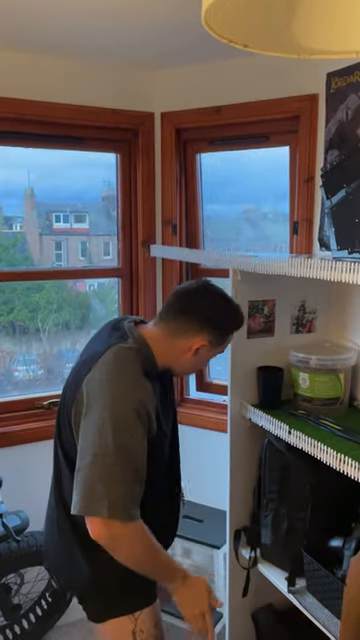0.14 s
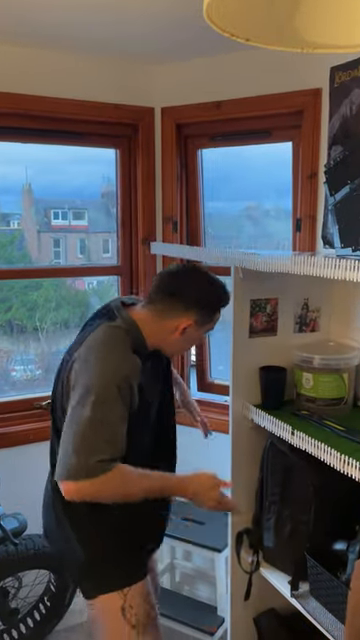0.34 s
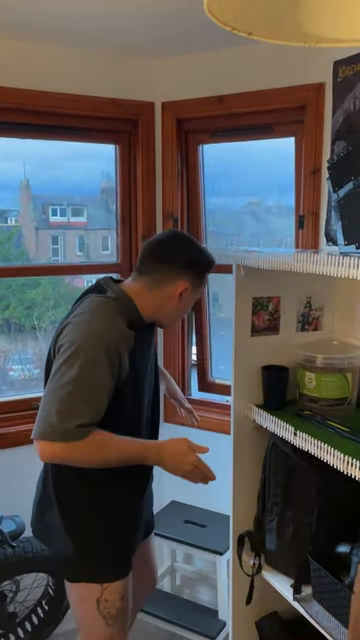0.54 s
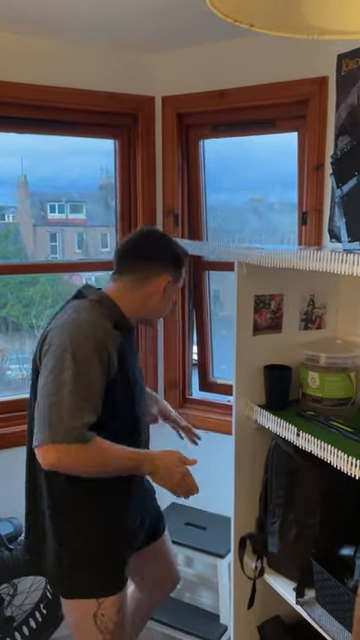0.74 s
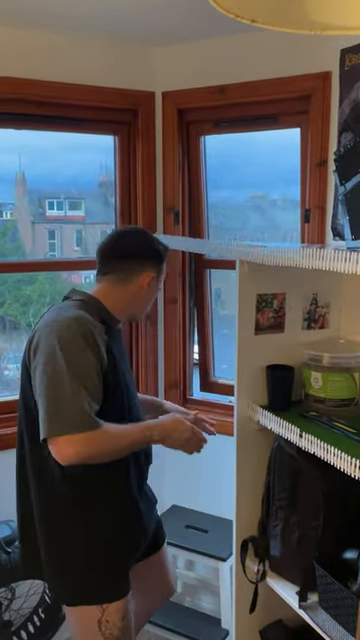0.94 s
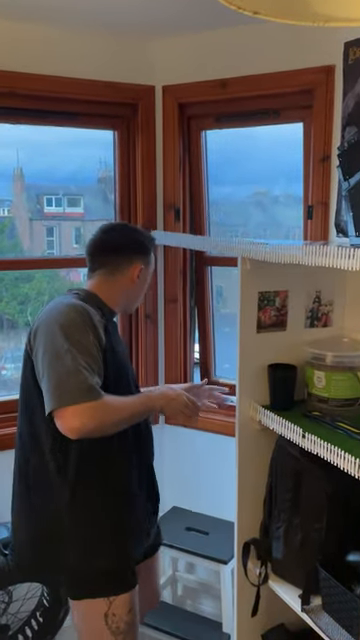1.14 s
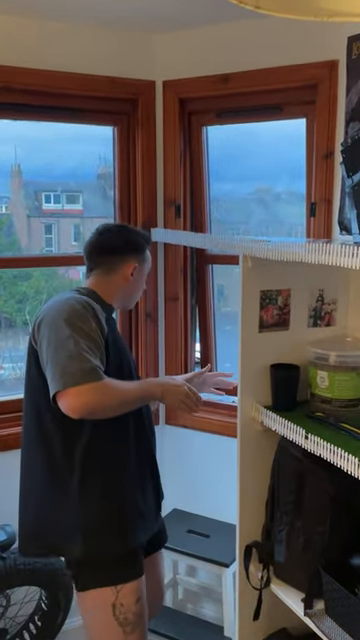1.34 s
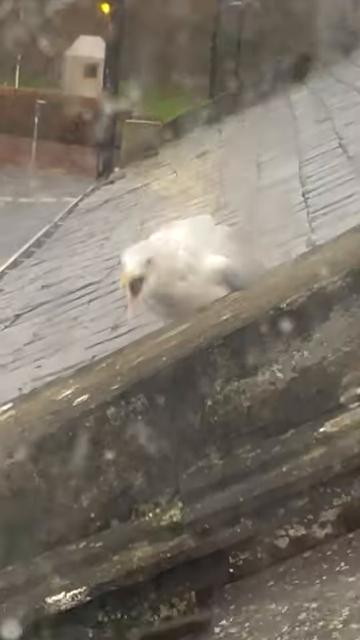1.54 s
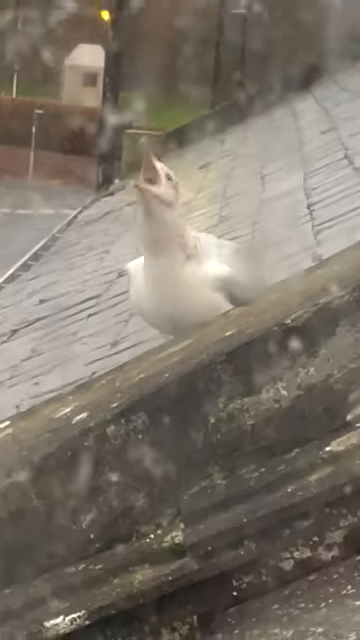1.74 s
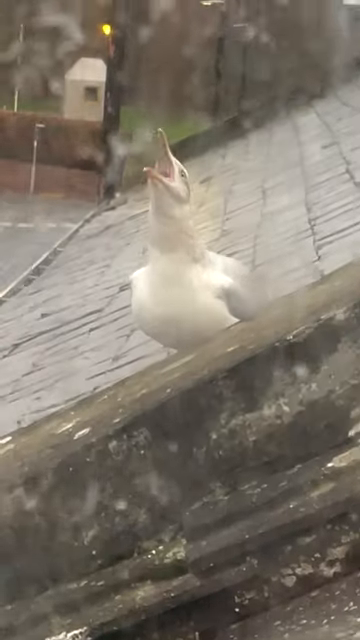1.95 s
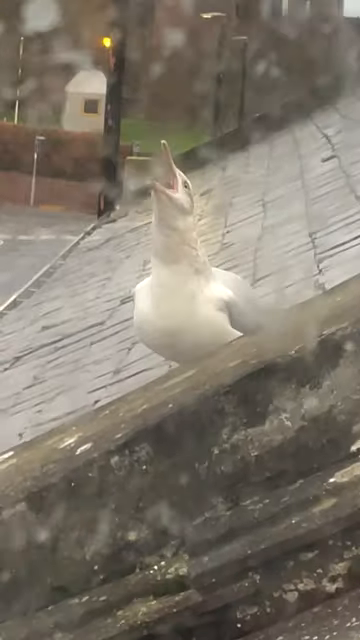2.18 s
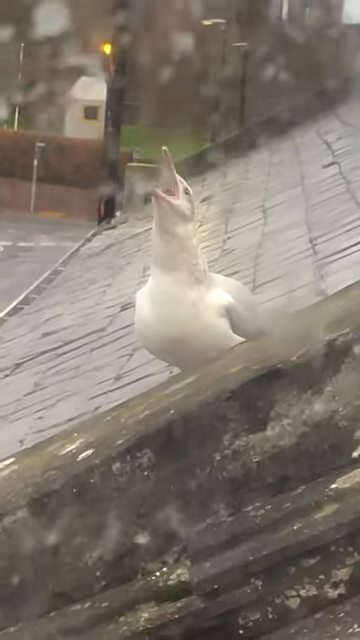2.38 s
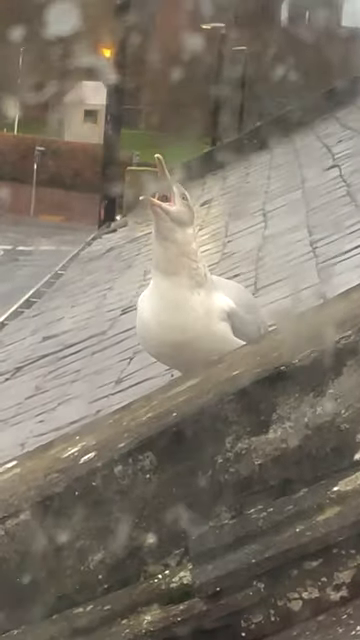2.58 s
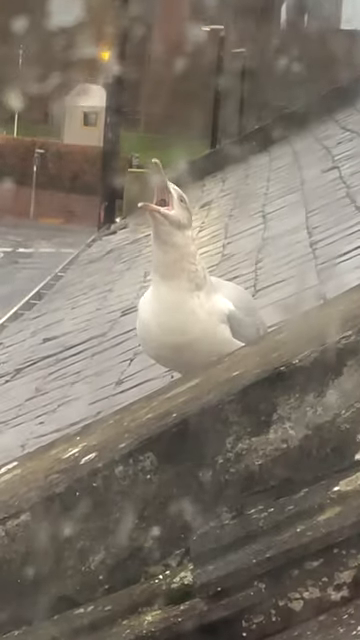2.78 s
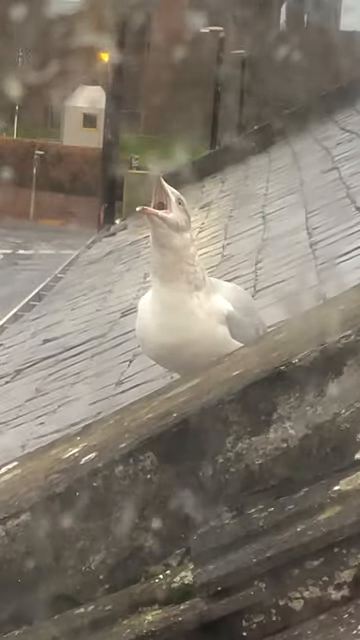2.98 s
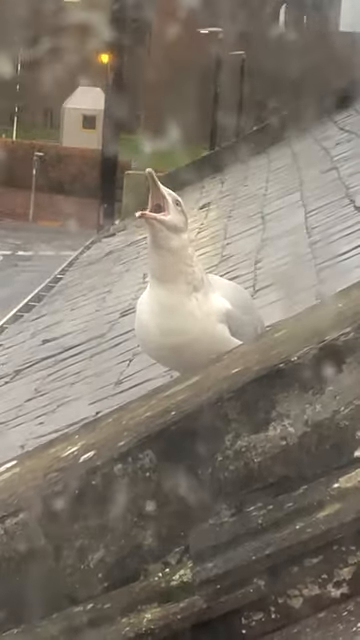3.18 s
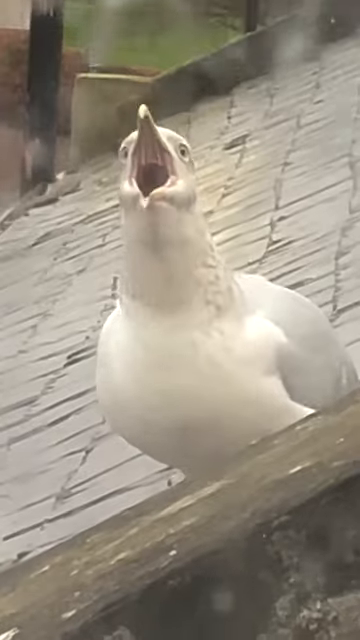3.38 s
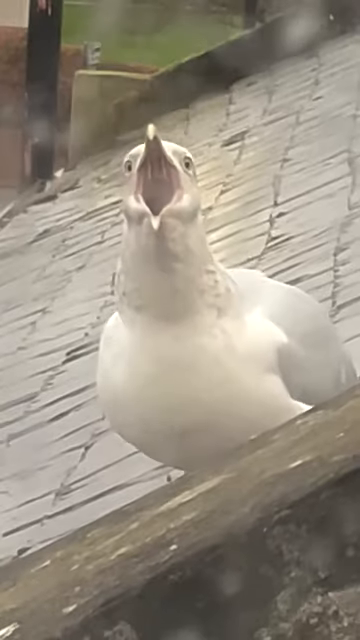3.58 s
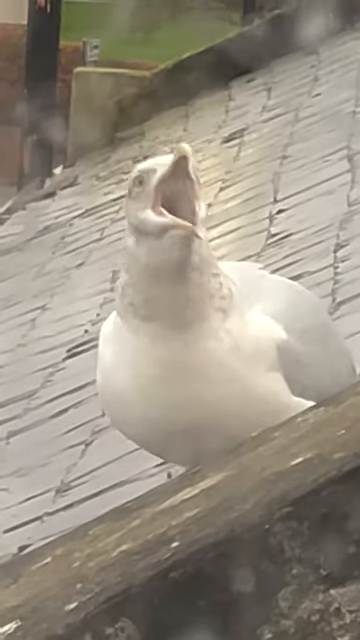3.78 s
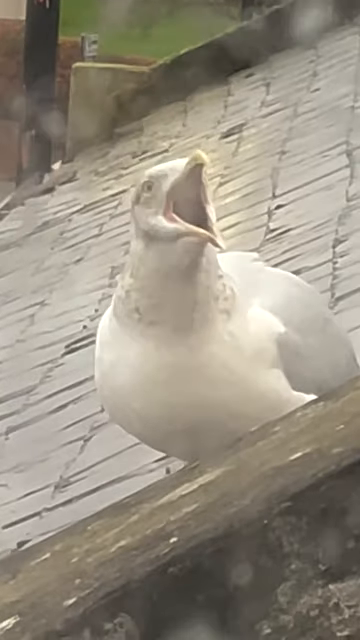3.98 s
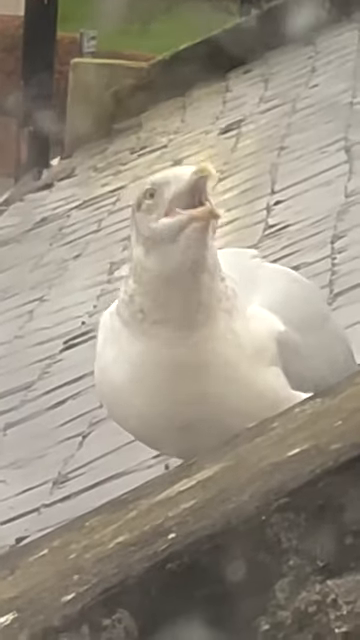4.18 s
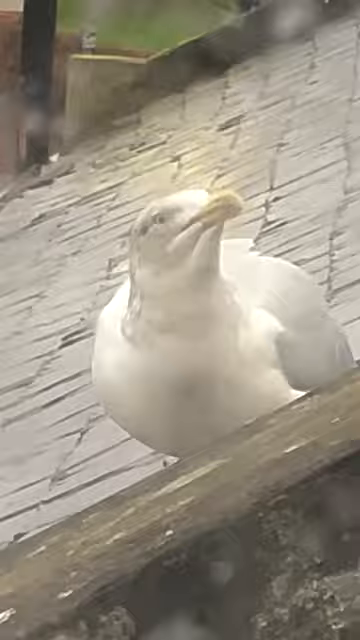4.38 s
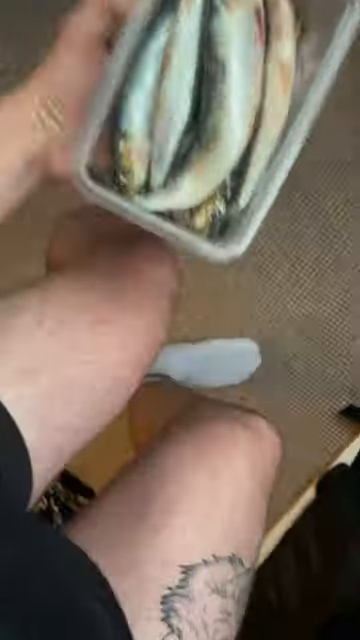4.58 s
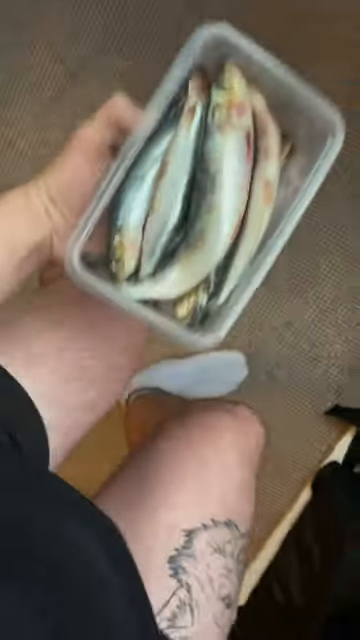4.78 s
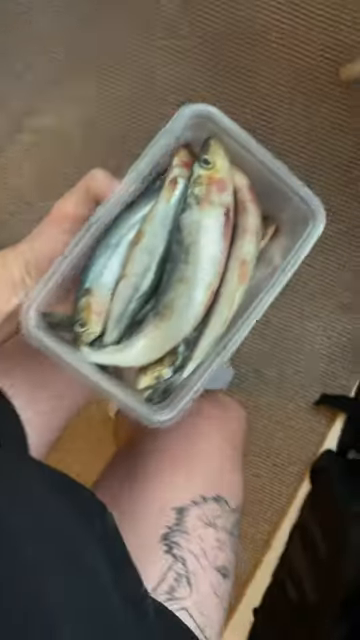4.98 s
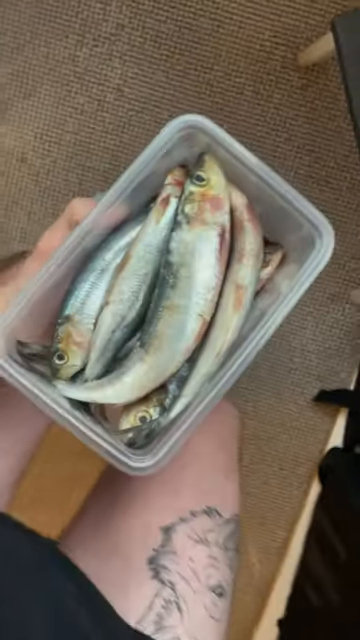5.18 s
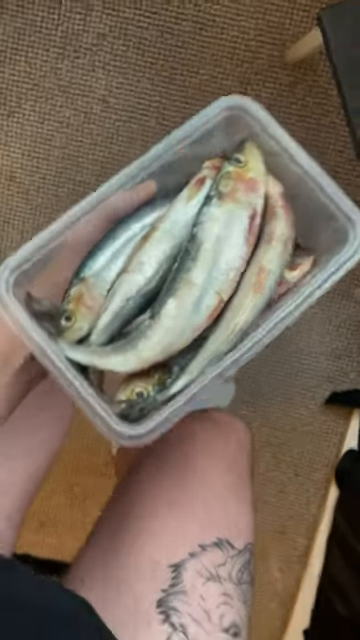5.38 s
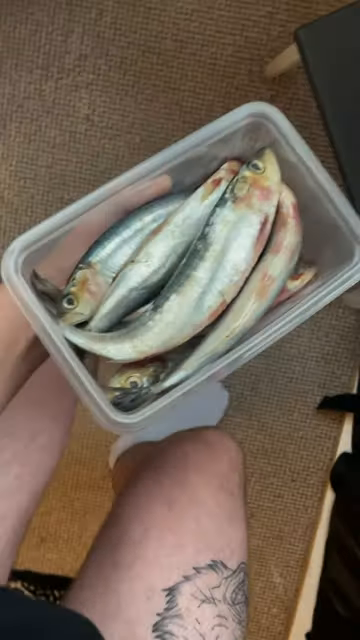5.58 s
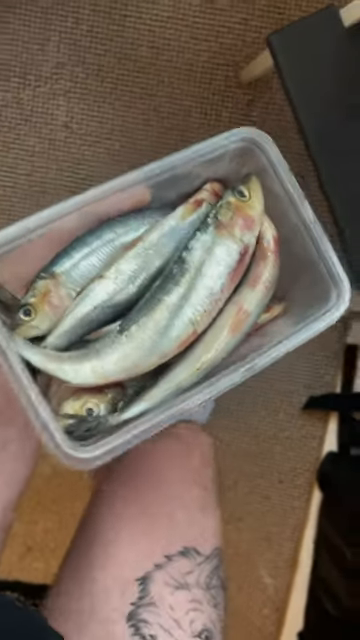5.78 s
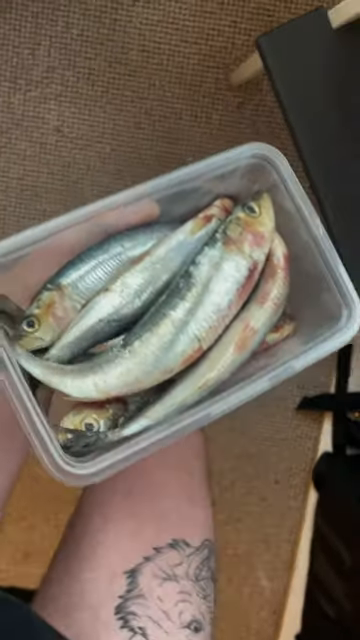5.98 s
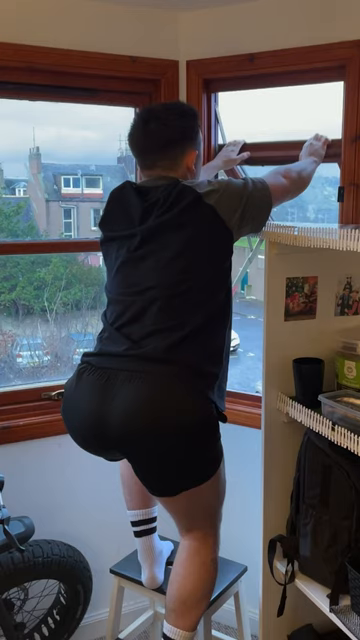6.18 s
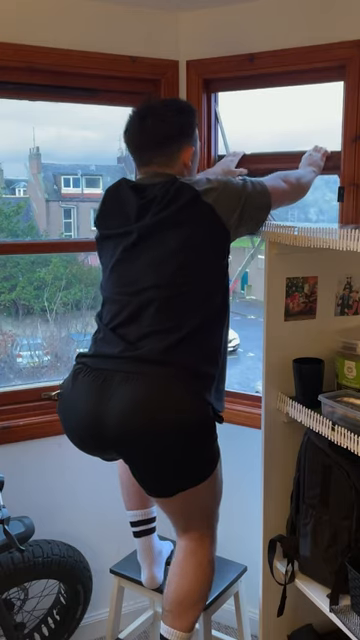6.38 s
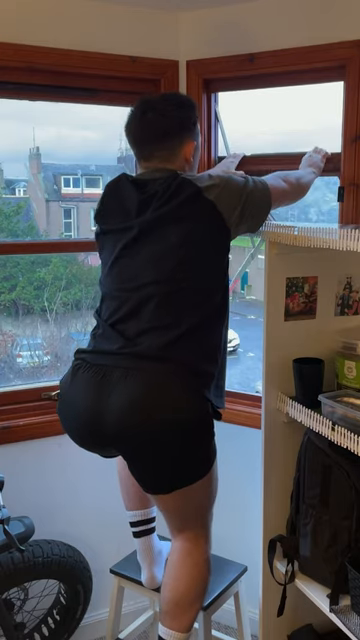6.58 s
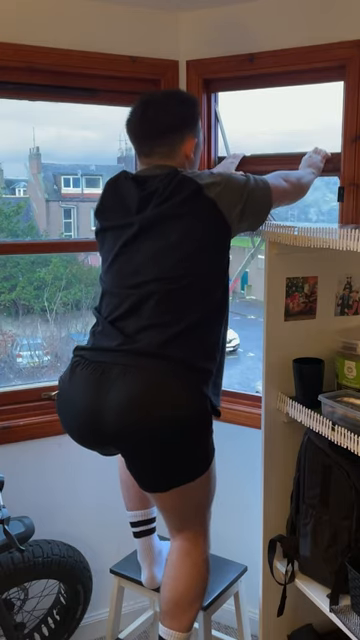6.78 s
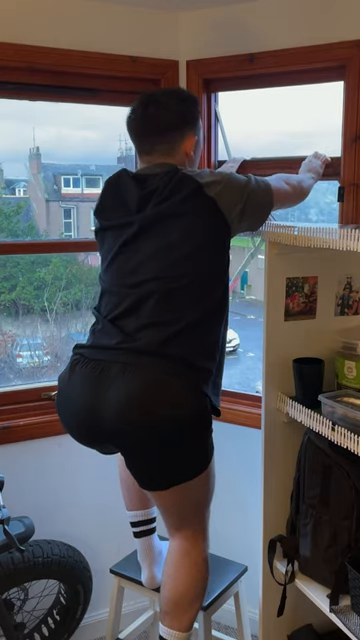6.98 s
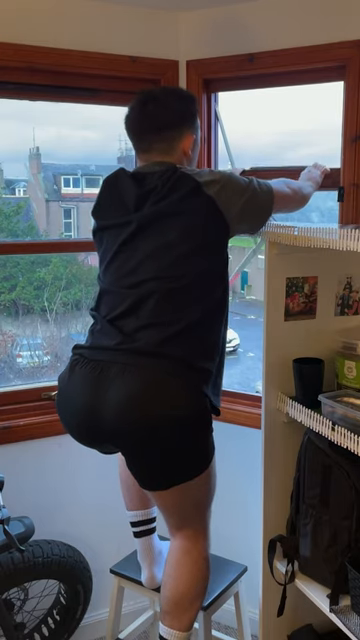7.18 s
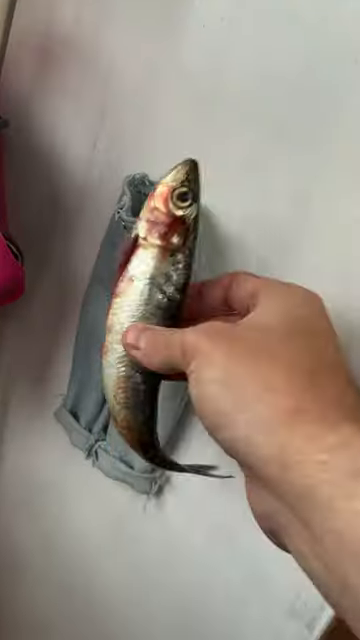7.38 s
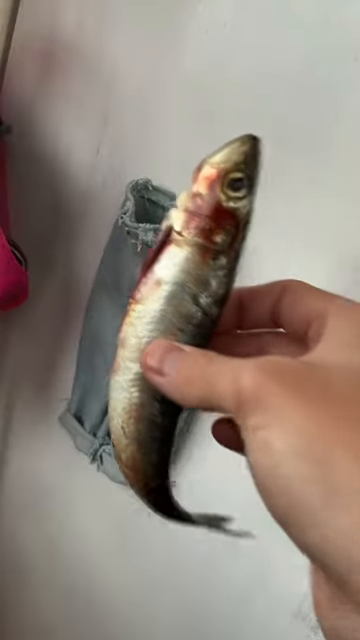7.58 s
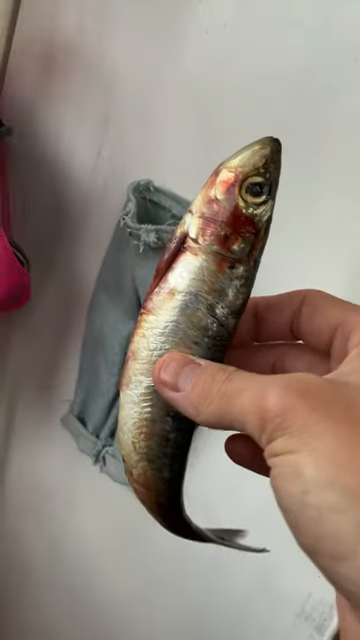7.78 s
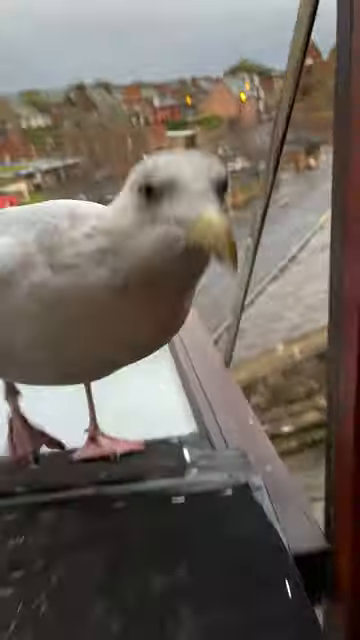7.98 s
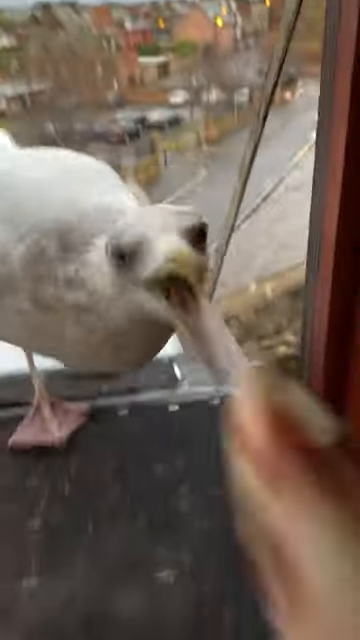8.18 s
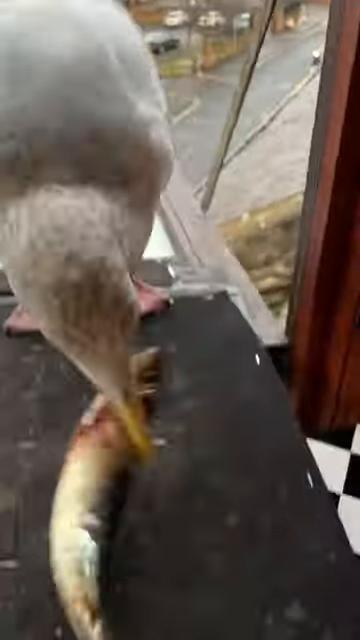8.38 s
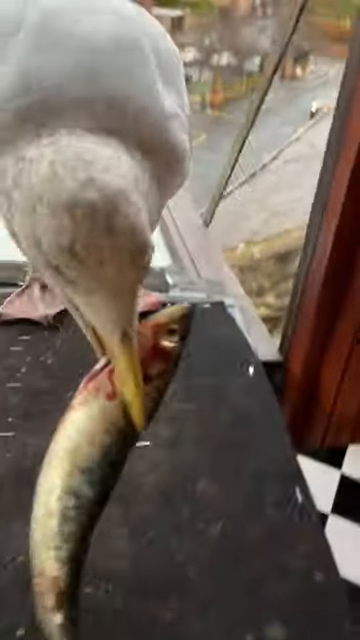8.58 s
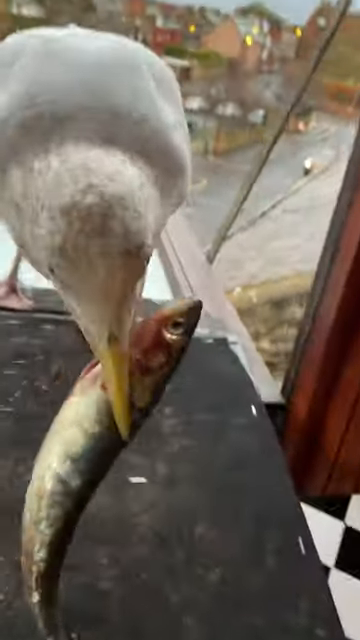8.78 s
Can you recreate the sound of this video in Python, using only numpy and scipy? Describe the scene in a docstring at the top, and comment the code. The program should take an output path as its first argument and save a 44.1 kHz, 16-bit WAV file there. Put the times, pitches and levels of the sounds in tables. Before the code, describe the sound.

Loud yelping gull call trailing into wheezy sighs, followed by two soft scrapes and sharp beak snaps with thuds on a windowsill.

```python
"""On a slate roof by an open window, a herring gull gives its long call: a held note, ten yelps and three
wheezy sighs, with thin whistles in between. Membranes shake in its voice box and its throat shapes the tone.
Indoors, something slides in two long scraping strokes. Then the gull snatches a fish at the window,
with thumps on the sill and clicks of its beak. Soft steps, far birds, an engine and the street lie behind."""
import sys
import numpy as np
from scipy import signal
from scipy.fft import rfft, irfft, next_fast_len
from scipy.io import wavfile
from scipy.ndimage import uniform_filter1d, map_coordinates

SR = 44100
rng = np.random.default_rng(int(sys.argv[2]) if len(sys.argv) > 2 else 0)


def int16_out(signal):
    """Quantize to a 16-bit WAV file."""
    q = np.round(np.clip(np.atleast_2d(signal).T, -1, 1) * 32767)
    wavfile.write(sys.argv[1], SR, q.astype(np.int16))


N = 390285
T = np.arange(N) / SR
TOP_HZ = 15850  # the highest frequency kept

# The yelps. Each row: times in seconds of the throat's catch, the jump up and the voice's break,
# pitch at the break in Hz, level of the high cry in dB, level of the low lead-in in dB.
YELPS = [(1.606, 1.692, 1.747, 1183, -12, -25.5), (1.842, 1.918, 1.964, 1194, -11, -18),
         (2.087, 2.157, 2.206, 1188, -11, -18), (2.338, 2.406, 2.453, 1187, -10.5, -17.5),
         (2.591, 2.652, 2.699, 1183, -11, -18.5), (2.846, 2.909, 2.958, 1176, -10.5, -17),
         (3.109, 3.17, 3.222, 1174, -11.5, -19), (3.38, 3.434, 3.495, 1166, -11, -26),
         (3.661, 3.691, 3.785, 1171, -12.5, -35), (3.992, 4.015, 4.135, 1153, -14, -21.5)]
# The opening note and the squeak after it. Each row: time in seconds, pitch in Hz, relative level in dB.
HELD_NOTE = [(1.108, 1291, -29), (1.14, 1241, -30), (1.204, 1248, -24), (1.242, 1284, -28.5),
             (1.256, 1312, -40), (1.278, 1370, -36), (1.288, 1450, -38)]
SQUEAK = [(1.29, 1853, -40), (1.314, 1852, -40), (1.37, 1866, -50), (1.428, 1914, -45), (1.44, 1890, -49),
          (1.46, 1764, -38), (1.478, 1720, -41.5)]
# Throat catches around those two. Each row: time in seconds, rise in seconds, relative level in dB.
OPENING_CATCHES = [(1.087, 0.029, -6.5), (1.481, .004, -1)]
# Whistles between notes. Each row: start in seconds, length in seconds, starting pitch in Hz, level in dB.
WHISTLES = [(0.782, 0.16, 1910, -57.5), (2.463, 0.18, 2276, -35.5), (2.766, 0.072, 3026, -38),
            (3.065, 0.064, 3013, -36.5), (3.365, 0.035, 2996, -32.5), (3.64, 0.057, 2990, -34),
            (3.933, 0.059, 2980, -35), (4.228, 0.059, 2970, -36), (4.524, 0.056, 2940, -39),
            (4.833, 0.043, 2947, -44.5)]
# The closing sighs. Each row: start in seconds, relative level in dB.
SIGHS = [(4.286, 1), (4.58, -2), (4.88, -11)]
# The two wheezes of a sigh. Each row: delay in seconds, length in seconds, relative level in dB.
SIGH_PARTS = [(0, .062, 1), (0.077, .118, -17)]
# Beak clicks. Each row: time in seconds, level in dB, relative level of the wood's ring in dB.
BEAK_CLICKS = [(8.142, -18, -6), (8.2567, -31.5, 6), (8.2985, -17, -4), (8.3517, -22, 5.5),
               (8.3949, -28, -20), (8.422, -41.5, 5), (8.4444, -35, 3), (8.5661, -31.5, -22),
               (8.606, -31.5, -23), (8.794, -23, -4.5), (8.812, -27, -1.5)]
# The fish hitting the sill. Each row: time in seconds, level in dB.
FISH_THUMPS = [(8.142, -29), (8.2581, -14.5), (8.288, -22), (8.349, -32), (8.442, -30)]
# The notes a struck frame and sill ring at. Each row: pitch in Hz, level in dB, seconds to fade by 60 dB.
FRAME_NOTES = [(1210, -0.5, 0.031), (1866, -6, 0.025), (2850, -5, 0.016), (3520, -17, 0.012),
               (5300, -16.5, 0.0077)]
SILL_NOTES = [(81.7, -9.5, .45), (131, -3, .11), (288, -7.5, .11), (385.4, 4.5, 0.04), (762, -6, 0.025)]
# Scraping strokes. Each row: start, fastest moment and end in seconds, level of the hollow rub in dB,
# level of the hiss in dB, pitch of the rub as a ratio.
STROKES = [(5.577, 6.194, 6.56, -35.5, -41, 1), (6.83, 7.301, 7.56, -36, -48, 0.81)]
# Light rustles. Each row: middle in seconds, rough half length in seconds, level in dB.
RUSTLES = [(0.11, 0.022, -66), (0.383, 0.045, -57.5), (.56, 0.028, -56), (0.716, 0.038, -65),
           (5.394, .013, -54), (5.441, 0.029, -62.5), (6.591, 0.02, -62.5), (6.69, 0.014, -65.5),
           (6.863, 0.0047, -50), (8.327, 0.021, -43.5), (8.445, 0.011, -47.5), (8.585, .015, -63),
           (8.775, 0.028, -57.5)]
# Soft steps. Each row: time in seconds, pitch of the floor in Hz, level in dB.
STEPS = [(0, 60.36, -44), (0.611, 68.5, -43)]
# Far bird calls. Each row: start and end in seconds, first and last pitch in Hz, level in dB.
FAR_BIRDS = [(7.583, 7.716, 4400, 4390, -71), (7.76, 7.94, 1613, 1516, -71), (7.837, 7.94, 4340, 4170, -63)]
# The background's rises and falls. Each row: start in seconds, rumble level in dB, street level in dB.
BACKGROUND_LEVELS = [(0, -62, -69), (1, -54, -58), (3.3, -55.5, -58.5), (4.401, -58.5, -60),
                     (5.029, -62.5, -74.5), (5.8, -50.5, -64), (7.55, -56, -60), (8.038, -42, -46.5)]

# Tone colours: how strong each sound is from bass to treble. Each row: frequency in Hz, gain in dB.
THROAT_TONE = [(850, -15.5), (1080, -4.5), (1210, -4), (1340, -9), (1750, -27), (2230, -8), (2500, 0),
               (2750, -1.5), (3600, -21), (4700, -40), (6200, -39.5), (7400, -32.5), (11500, -44.5),
               (15000, -74.5)]
SQUEAK_TONE = [(1800, 1.5), (3600, -22.5), (5600, -14), (7500, -24), (9400, -23), (11300, -51),
               (13500, -40.5)]
WHISTLE_TONE = [(2000, -5.5), (3100, 4.5), (3900, -28.5), (6000, -40.5), (9000, -45), (14000, -66)]
WHEEZE_TONE = [(690, -19.5), (1400, 1.5), (2100, -9.5), (2800, -5), (3400, -6), (4200, -26), (5500, -49),
               (8000, -23.5), (13000, -47.5)]
RASP_TONE = [(150, -40.5), (400, -5), (650, -15.5), (900, -3), (1150, 13), (1400, -6.5), (1750, -6),
             (2550, 1.5), (3200, -4.5), (4500, -32.5), (7500, -33), (12000, -39), (16000, -61.5)]
RUB_TONE = [(30, -47), (70, -3), (130, 2), (230, 2.5), (340, -1), (470, -5.5), (750, -14), (1500, -28.5),
            (4000, -48.5)]
HISS_TONE = [(300, -1), (700, 7), (1200, 1.5), (2500, -2.5), (4000, -6), (5500, -7), (8500, -11),
             (12000, -11.5), (14000, -18), (16000, -34)]
RUSTLE_TONE = [(300, -15), (800, -8.5), (1300, -0.5), (2800, 0), (5500, -5), (12000, -3), (16000, -23.5)]
FAR_BIRD_TONE = [(1600, 5.5), (3000, -17.5), (4400, -7.5), (4800, -27), (6000, -40)]
RUMBLE_TONE = [(22, -42.5), (42, 1.5), (62, -1.5), (100, -2.5), (160, -10), (300, -30), (700, -47)]
STREET_TONE = [(100, 4), (250, 0), (500, -4.5), (800, -4.5), (1150, -2.5), (1800, -12.5), (3000, -24),
               (5000, -36), (12000, -32.5), (16000, -61.5)]
ECHO_TONE = [(300, -3), (1200, 0.5), (2400, -9.5), (3000, 2), (4200, 6.5), (8000, -1)]
MICROPHONE_TONE = [(20, -14.5), (40, 1), (12500, 0), (14000, -5), (15800, -18)]
# How long the walls' echo lasts. Each row: frequency in Hz, seconds to fade by 60 dB.
ECHO_FADE = [(200, .4), (1200, 0.55), (2800, 0.41), (6000, 0.1), (12000, 0.13)]
# The microphone's two openings. Each row: frequency in Hz, how far the left wave leads in radians.
LEFT_LEAD = [(100, 0), (250, .22), (700, .33), (1300, .42), (2500, .45), (4000, .65), (5500, .4),
             (7000, 1.35), (8500, 2.35), (9400, 3), (10600, 3.25), (12000, 4.2), (15500, 6.2)]


def voice(path, tone, jitter, hoarse=0, break_s=np.inf):
    """A bird's voice box makes a pitch and its multiples (harmonics); the throat colours them."""
    # Each row of path: time in seconds, pitch in Hz, level in dB, brightness in dB.
    t = np.arange(path[0][0], max(path[-1][0], path[0][0] + .01), 1 / SR)
    hz, db, bright_db = curves(path, t)
    # once the voice breaks, the membranes shake unevenly
    broken = ramp((t - break_s) / .0025 + 1)
    hz = hz * (1 + (jitter + .013 * broken) * wobble(700, len(t)) + jitter * wobble(90, len(t)) / 2)
    phase = 2 * np.pi * np.cumsum(hz) / SR
    harmonic = np.arange(1, 11)[:, None]
    upper = harmonic > 2
    # pressing harder lifts the upper harmonics most
    lift_db = np.where(upper, 1, (harmonic - 1) * .22) * bright_db
    flutter_db = np.array([wobble(110, len(t)) for _ in harmonic]) * np.where(upper, 3.5, .4)
    gains = amp(db + along(tone, harmonic * hz) + lift_db + flutter_db) * (harmonic * hz < TOP_HZ)
    # hoarseness roughens the upper harmonics; the lowest two stay nearly pure
    fray = 1 + hoarse * np.where(upper, 2 * harmonic, .5) * np.array([wobble(800, len(t)) for _ in harmonic])
    # every other shake is unequal, which adds weak tones halfway between the harmonics
    halfway_gain = hoarse * amp(db - 11 + 8 * wobble(23, len(t)))
    halfway = sum(k * np.sin((k + .5) * phase + wobble(420, len(t))) for k in (1, 2))
    harmonics = np.sum(gains * fray * np.sin(harmonic * phase), axis=0)
    return (harmonics + halfway_gain * halfway) * signal.windows.tukey(len(t), .05)


def yelps(low_hz=1109, high_hz=1337.4, broken_hz=983, attack_s=.0077, crest_s=.02):
    """Each yelp starts low, jumps to a loud high cry, sags, then breaks and drops."""
    out = np.zeros(N)
    middle_s = np.mean([row[0] for row in YELPS])
    for catch_s, jump_s, break_s, end_hz, cry_db, lead_db in YELPS:
        start_s = catch_s + .013  # a tiny pause after the catch
        tail_s = .48 * (break_s - jump_s)
        t = T[(T >= start_s) & (T < break_s + tail_s)]
        # low, high and broken each hold a pitch in Hz, a level in dB and a brightness in dB
        bend = ramp((t - start_s) / max(jump_s - start_s, attack_s)) ** 3
        low = [low_hz + 134 * bend, lead_db - 6 * bend ** 2, np.full_like(t, -17.5)]
        sag = 1 - ramp((break_s - t) / min(.082, break_s - jump_s))
        # the cry is strongest crest_s before the break, then eases
        swell_db = -4 * ramp((break_s - crest_s - t) / .026)
        ease_db = -3 * ramp(1 - (break_s - t) / crest_s) ** 2
        opened = ramp((t - jump_s) / .028)
        high = [high_hz + (end_hz - high_hz) * sag, cry_db + swell_db + ease_db, -12.5 + 9 * opened]
        after_s = np.maximum(t - break_s, 0)
        falling_hz = broken_hz - 2100 * after_s + (end_hz - broken_hz) * np.exp(-after_s / .003)
        broken = [falling_hz, -16.5 - 24.5 * (after_s / tail_s) ** 2, np.full_like(t, -6.5)]
        stages = np.where(t < jump_s, low, np.where(t < break_s, high, broken))
        hz, db, bright_db = uniform_filter1d(stages, size=180, axis=1)
        # no two yelps waver alike
        hz *= 1 + .005 * wobble(45, len(t))
        db += wobble(90, len(t))
        # the voice grows harsher and hoarser as the call goes on
        bright_db += 2 * (catch_s - middle_s)
        hoarse = .02 + .014 * (catch_s - YELPS[0][0])
        path = np.transpose([t, hz, db, bright_db])
        yelp = voice(path, THROAT_TONE, jitter=.004, hoarse=hoarse, break_s=break_s)
        add(out, start_s, yelp * ramp(T[:len(yelp)] / attack_s))
    return out


def opening_note():
    """A clean held note flips up into a thin squeak."""
    out = np.zeros(N)
    held = [(s, hz, db + 3, -6) for s, hz, db in HELD_NOTE]
    squeak = [(s, hz, db + 1, 3) for s, hz, db in SQUEAK]
    add(out, held[0][0], voice(held, THROAT_TONE, jitter=.001))
    add(out, squeak[0][0], voice(squeak, SQUEAK_TONE, jitter=.00065))
    return out


def glide(start_s, length_s, hz, change_hz, db, tone, jitter, edge_db):
    """A short, soft bird note swells and fades while its pitch slides."""
    out = np.zeros(N)
    progress = np.array([0, .15, .7, .88, 1])
    swell_db = np.array([edge_db, -3, 0, -2, edge_db])
    path = np.transpose([start_s + progress * length_s, hz + progress * change_hz, db + swell_db, np.zeros(5)])
    add(out, start_s, voice(path, tone, jitter))
    return out


def whistles(rise_share=.026):
    """Air whistles through the gull's throat between notes, rising a little."""
    return sum(glide(s, length, hz, rise_share * hz, db, WHISTLE_TONE, jitter=.0021, edge_db=-18.5)
               for s, length, hz, db in WHISTLES)


def wheezes(sigh_hz=724, sink_hz_per_s=1130):
    """One wheeze lingers between two yelps; at the end the tired voice sighs in sinking pairs."""
    out = glide(1.96, .115, hz=717, change_hz=-11.5, db=-44, tone=WHEEZE_TONE, jitter=.003, edge_db=-8.5)
    for s, db in SIGHS:
        for delay, length, part_db in SIGH_PARTS:
            out += glide(s + delay, length, sigh_hz, -sink_hz_per_s * length, db + part_db - 41,
                         WHEEZE_TONE, jitter=.013, edge_db=-6)
    return out


def throat_catches(yip_hz=1210, yip_half_s=.012):
    """Air crackles through the half-closed voice box until it catches in a short, rough yip."""
    before_yelps = [(row[0], .028, -4 * np.exp(-k)) for k, row in enumerate(YELPS)]
    after_wheezes = [(s + delay + length - .008, .024, db - 15 + .57 * part_db)
                     for s, db in SIGHS for delay, length, part_db in SIGH_PARTS]
    breath, yips = np.zeros(N), np.zeros(N)
    for s, rise_s, db in list(OPENING_CATCHES) + before_yelps + after_wheezes:
        times = [s - rise_s - .004, s - rise_s, s, s + .005, s + .01]
        breath += amp(db - 30) * np.interp(T, times, [0, amp(-9), 1, .4, 0])
        yip_db = db - 25.5
        path = [(s - yip_half_s, .88 * yip_hz, yip_db - 12, -10),
                (s, yip_hz, yip_db, -10),
                (s + yip_half_s, yip_hz, yip_db - 10.5, -10)]
        add(yips, s - yip_half_s, voice(path, THROAT_TONE, jitter=.025))
    crackle = unit(noise(RASP_TONE) * amp(2 * wobble(450)))
    return yips + breath * crackle


def snatch(crack_fade_s=.02, rebound_s=.004):
    """The beak snaps and knocks the frame, each time at another spot; the fish thumps on the sill."""
    out, t = np.zeros(N), np.arange(SR // 2) / SR
    rebounds = [(s + rebound_s, db - 9.5, wood_db) for s, db, wood_db in BEAK_CLICKS]
    for s, db, wood_db in list(BEAK_CLICKS) + rebounds:
        crack = amp(-8 - 60 * t / crack_fade_s) * rng.standard_normal(len(t))
        detune = np.exp(.11 * rng.normal())
        wood = amp(wood_db - 6) * ring(FRAME_NOTES, t * detune)
        add(out, s, amp(db) * (crack + wood))
    soft_onset = 1 - np.exp(-t / .0033)
    for s, db in FISH_THUMPS:
        add(out, s, amp(db) * ring(SILL_NOTES, t) * soft_onset)
    return out


def scrapes(sink_ratio=.65, sink_s=.4, hiss_lead_s=.075):
    """Two slides speed up and slow down, each a hollow rub under a dry hiss; the second is deeper."""
    out = np.zeros(N)
    for start, peak, end, rub_db, hiss_db, pitch in STROKES:
        contact = ramp(np.minimum(T - start, end - T) / .023)
        grip = wobble(45)
        # the rub sinks in pitch as the slide slows
        fast = noise([(hz * pitch, db) for hz, db in RUB_TONE])
        slow = noise([(hz * pitch * sink_ratio, db) for hz, db in RUB_TONE])
        slowed = ramp((T - peak) / sink_s)
        rub = np.sqrt(1 - slowed) * fast + np.sqrt(slowed) * slow
        rub_gain = amp(rub_db - 91 * (T - peak) ** 2 + .58 * grip)
        hiss_gain = amp(hiss_db - 108.5 * (T - peak + hiss_lead_s) ** 2 + .56 * (grip + wobble(700)))
        out += contact * (rub_gain * rub + hiss_gain * noise(HISS_TONE))
    return out


def rustles(nibble_start_s=8.36):
    """Handling makes brief, grainy rustles; near the end the fish crackles in the beak."""
    handling = sum(amp(db) * np.exp(-.5 * ((T - s) / half_s) ** 2) for s, half_s, db in RUSTLES)
    nibble = (T > nibble_start_s) * amp(-75.5 + 10 * wobble(220))
    grains = unit(noise(RUSTLE_TONE) * amp(2.3 * wobble(500)))
    return (handling + nibble) * grains


def steps(fade_s=1.6, attack_s=.005):
    """Each soft step sets a springy floor booming."""
    out = np.zeros(N)
    for s, hz, db in STEPS:
        t = np.maximum(T - s, 0)
        out += amp(db - 60 * t / fade_s) * (1 - np.exp(-t / attack_s)) * np.sin(2 * np.pi * hz * t)
    return out


def far_birds():
    """Birds call faintly from across the street."""
    return sum(glide(start, end - start, hz, last_hz - hz, db, FAR_BIRD_TONE, jitter=.008, edge_db=-21)
               for start, end, hz, last_hz, db in FAR_BIRDS)


def engine(nearest_s=1.92, pass_s=.25):
    """A far vehicle hums past, loudest and highest when it is nearest."""
    away_s = np.abs(T - nearest_s)
    hz = (145.5 - 15 * away_s) * (1 + .01 * wobble(25))
    gain = amp(-52.5 + 2.3 * wobble(14)) / np.hypot(1, away_s / pass_s)
    return gain * np.sin(2 * np.pi * np.cumsum(hz) / SR)


def background(fade_s=.22, width=.15):
    """A low rumble and the wash of the street rise and fall; the engine fades when the street is quiet."""
    starts, *levels = np.transpose(BACKGROUND_LEVELS)
    row = np.searchsorted(starts[1:], T)
    rumble_db, street_db = uniform_filter1d(np.array(levels)[:, row], size=int(fade_s * SR), axis=1)
    rumble = amp(rumble_db + 1.2 * wobble(5)) * noise(RUMBLE_TONE)
    hum = engine() * ramp(amp(street_db + 58))
    street = noise(STREET_TONE) + width * np.array([noise(STREET_TONE), noise(STREET_TONE)])
    return rumble + hum + amp(street_db + wobble(7.1)) * street


def house_echo(x, delay_s=.335, cutoff_hz=1600):
    """The houses across the street send back a late, dull echo."""
    return filtered(x, lambda hz: amp(-26) * np.exp(-2j * np.pi * hz * delay_s) / (1 + (hz / cutoff_hz) ** 4))


def with_echoes(x, early_db, tail_db, early_fade_s=.064, width=.18):
    """Near surfaces answer a sound at once; farther walls add a faint tail."""
    hz, t, spectra = signal.stft(rng.standard_normal((3, SR // 2)), SR, nperseg=256)
    fading = amp(along(ECHO_TONE, hz)[:, None] - 60 * t / along(ECHO_FADE, hz)[:, None])
    tail = signal.istft(spectra * fading, SR, nperseg=256)[1]
    early = rng.standard_normal(tail.shape) * amp(-60 * np.arange(tail.shape[1]) / SR / early_fade_s)
    answer = amp(tail_db) * tail / np.linalg.norm(tail[0]) + amp(early_db) * early / np.linalg.norm(early[0])
    # left and right share one answer, plus a little of their own
    stereo = answer[0] + width * answer[1:]
    delayed = np.pad(stereo, ((0, 0), (round(.004 * SR), 0)))
    return x + signal.fftconvolve(x[None], delayed, axes=1)[:, :N]


def ring(notes, t, scatter_db=2.5):
    """A struck object rings at its own fading notes, with new strengths at each hit."""
    return sum(amp(db + scatter_db * rng.normal() - 60 * t / fade_s) * np.sin(2 * np.pi * hz * t)
               for hz, db, fade_s in notes)


def amp(db):
    """Turn decibels into a gain."""
    return 10 ** (np.asarray(db) / 20)


def unit(x):
    """Scale a sound to an average power of 1."""
    return x / np.sqrt(np.mean(x ** 2) + 1e-20)


def ramp(x):
    """Rise from 0 to 1 and stay there."""
    return np.clip(x, 0, 1)


def along(points, hz):
    """Read between rows of frequency and value, with octaves evenly spaced."""
    frequencies, values = np.transpose(points)
    return np.interp(np.log(hz + 1), np.log(frequencies + 1), values)


def curves(rows, t):
    """Read each column after the time column at times t."""
    times, *columns = np.transpose(rows)
    return [np.interp(t, np.sort(times), column) for column in columns]


def wobble(rate, size=N):
    """A smooth curve through `rate` random points a second."""
    return map_coordinates(rng.standard_normal(int(size * rate / SR) + 4), [np.arange(size) * rate / SR])


def filtered(x, response):
    """Scale and shift each frequency of a sound by response(hz)."""
    size = next_fast_len(N + SR // 2)
    return irfft(rfft(x, size) * response(np.fft.rfftfreq(size, 1 / SR)), size)[..., :N]


def noise(tone):
    """Noise with the given tone colour and an average power of 1."""
    return unit(filtered(rng.standard_normal(N), lambda hz: amp(along(tone, hz))))


def add(track, start_s, sound):
    """Mix a sound into the track at its start time."""
    i = max(round(start_s * SR), 0)
    track[i:i + len(sound)] += sound[:max(N - i, 0)]


def scene():
    """Mix the gull outside, the noises indoors and at the window, and the street behind."""
    call = opening_note() + yelps() + whistles() + wheezes() + throat_catches()
    gull = with_echoes(call + house_echo(call), early_db=-17, tail_db=-19)
    indoors = with_echoes(scrapes() + rustles(), early_db=-10.5, tail_db=-20, width=.59)
    window = with_echoes(snatch(), early_db=-10, tail_db=-22)
    return gull + indoors + window + steps() + far_birds() + background()


def record(dry):
    """The microphone trims the deepest bass and top treble; its two sides drift out of step up high."""
    def response(hz):
        shift = np.exp(.5j * along(LEFT_LEAD, hz) * np.array([[1], [-1]]))
        return shift * amp(along(MICROPHONE_TONE, hz)) * (hz < TOP_HZ)
    return filtered(dry, response)


dry = scene()
out = record(dry)
int16_out(out)
```